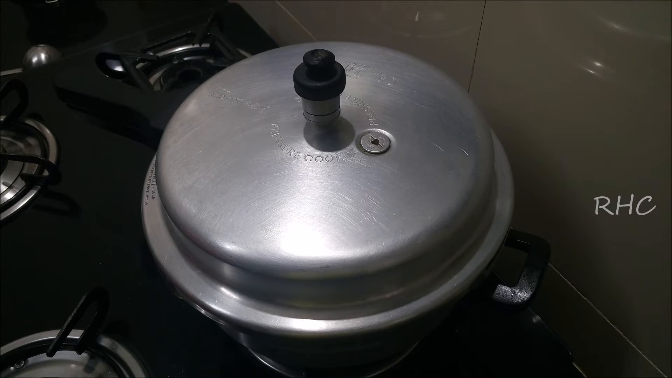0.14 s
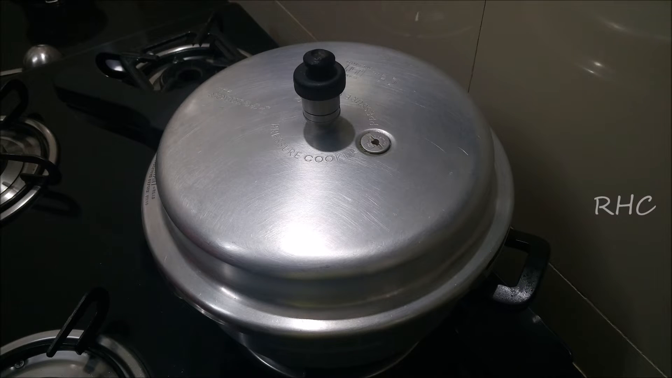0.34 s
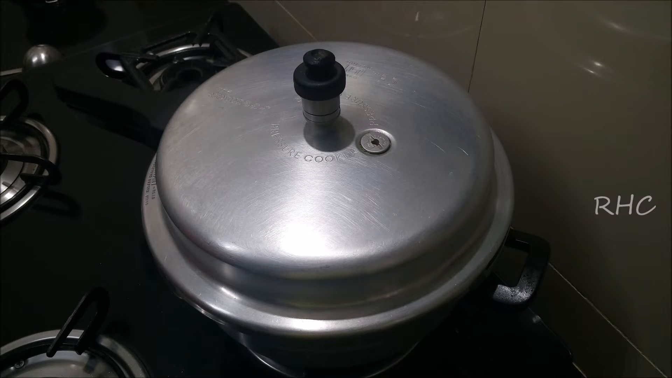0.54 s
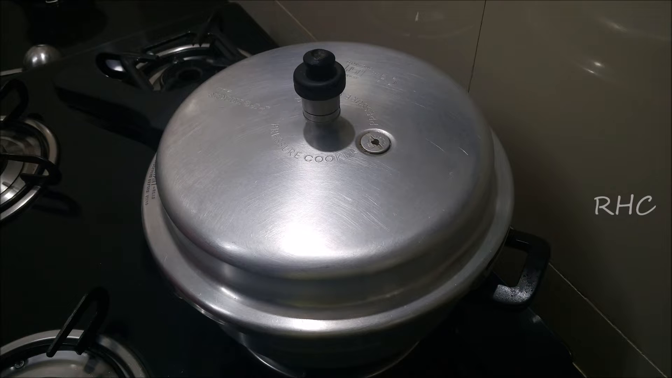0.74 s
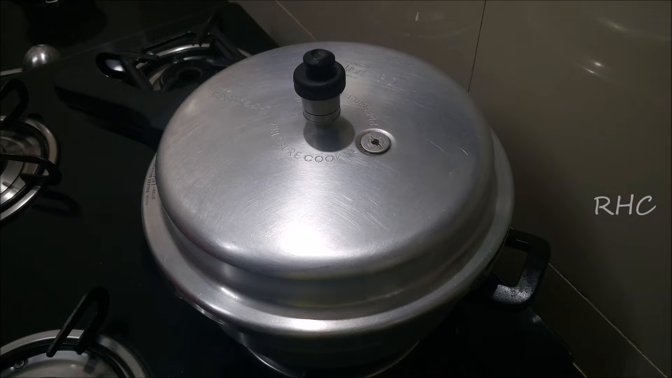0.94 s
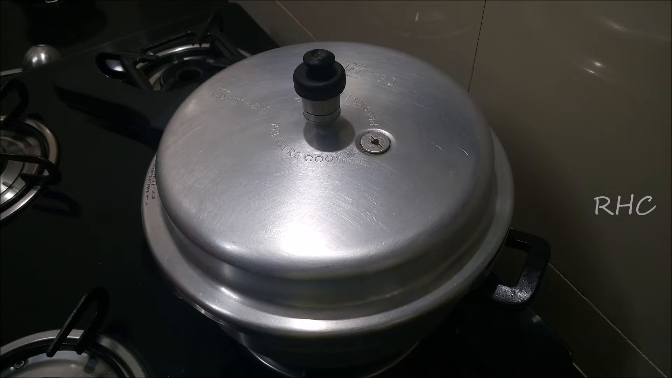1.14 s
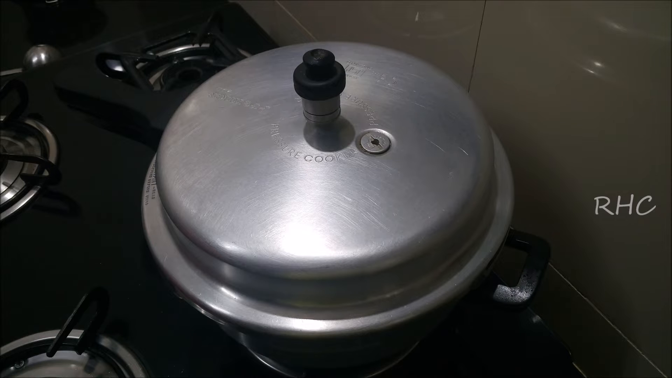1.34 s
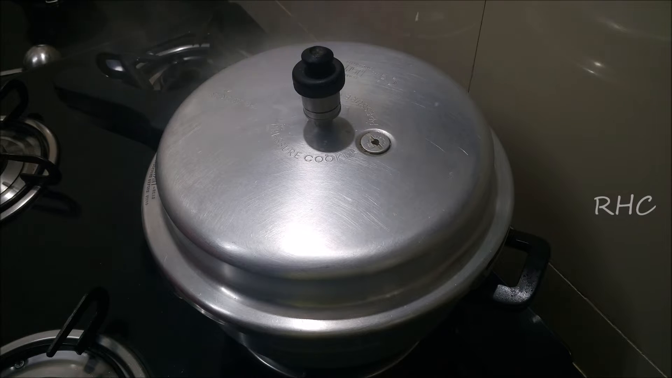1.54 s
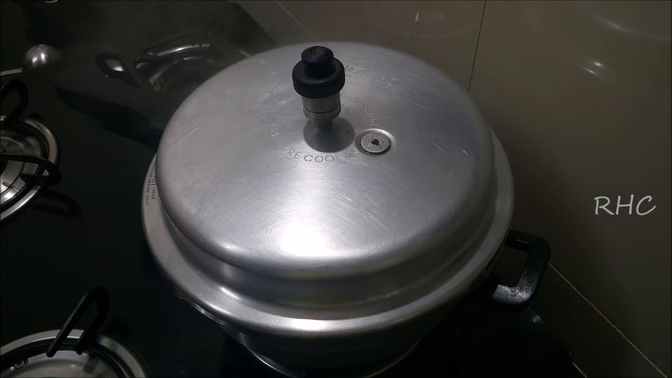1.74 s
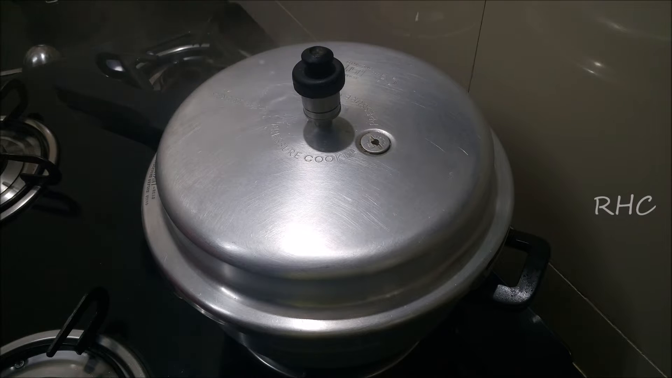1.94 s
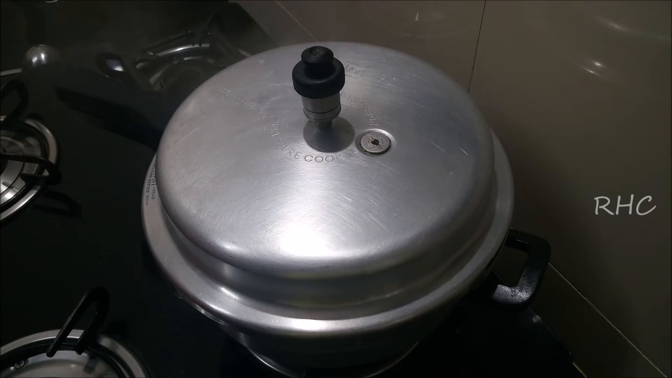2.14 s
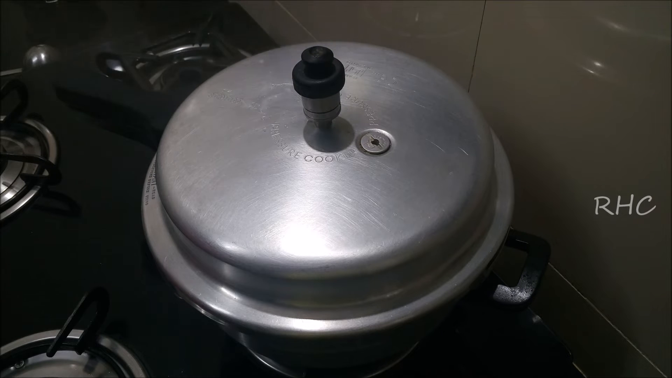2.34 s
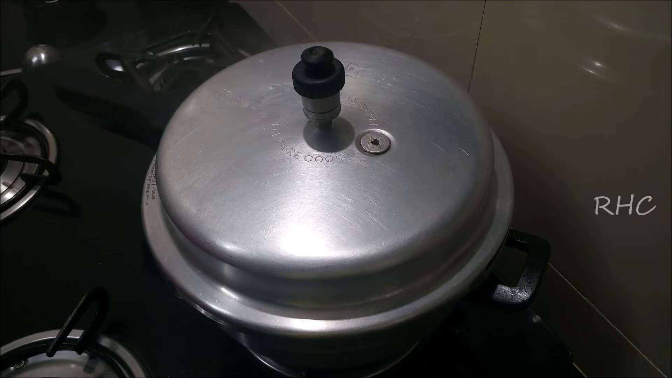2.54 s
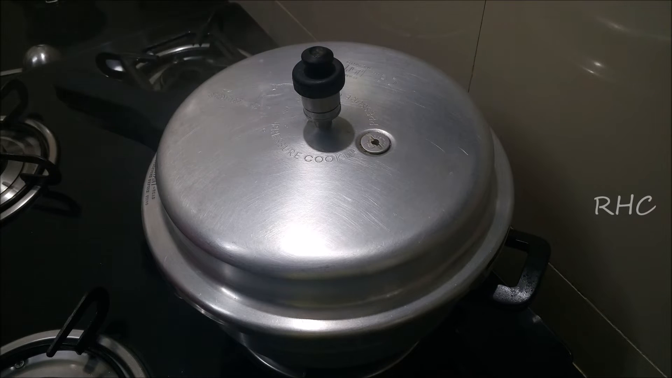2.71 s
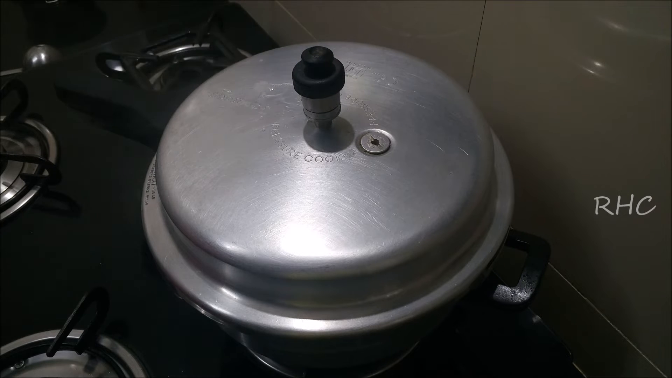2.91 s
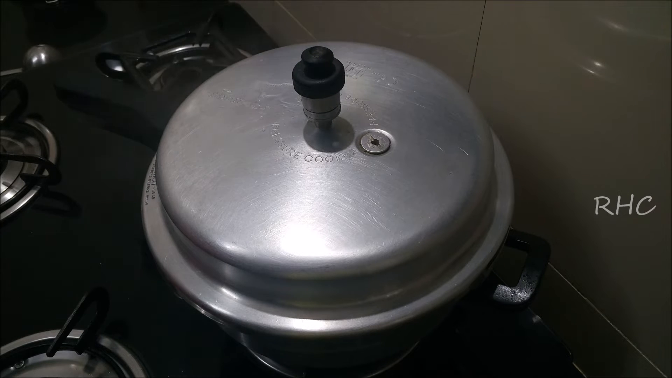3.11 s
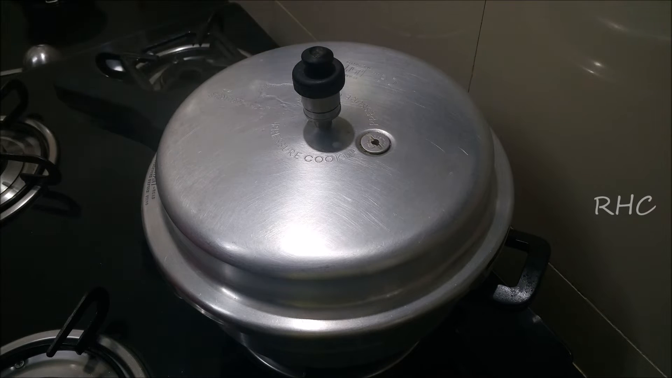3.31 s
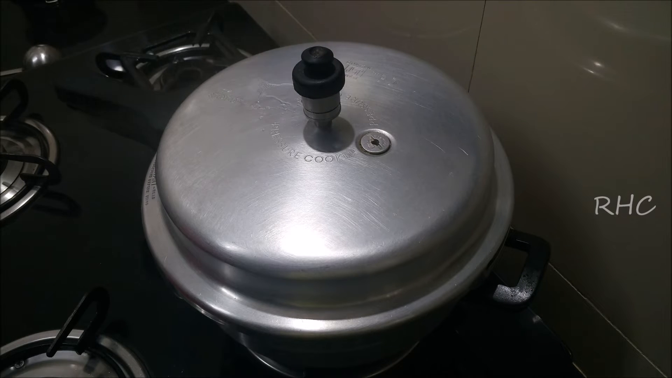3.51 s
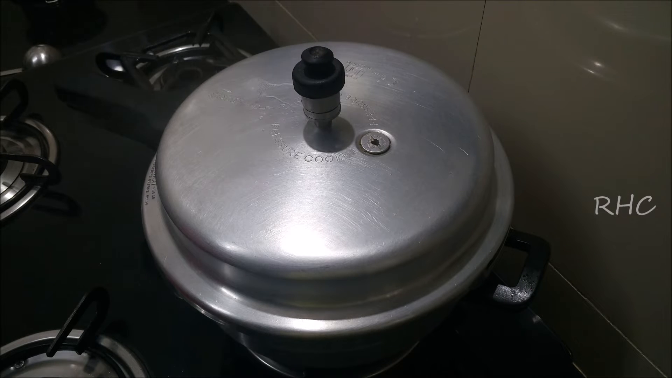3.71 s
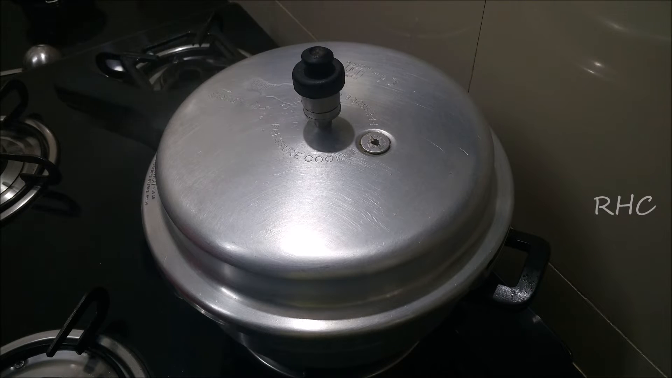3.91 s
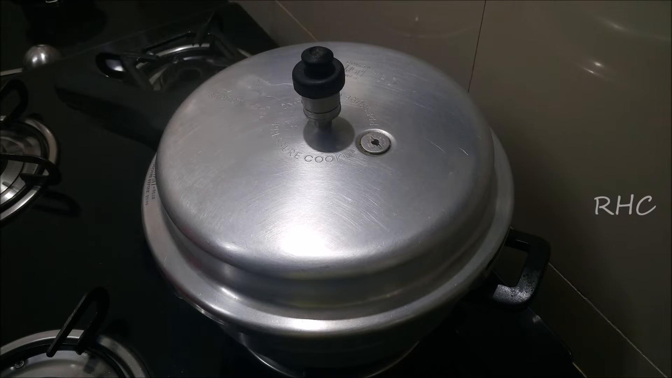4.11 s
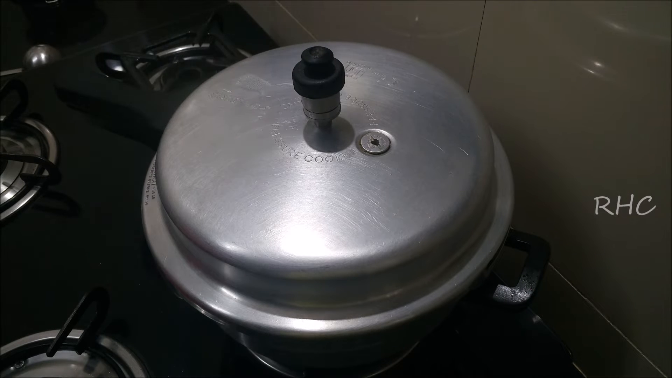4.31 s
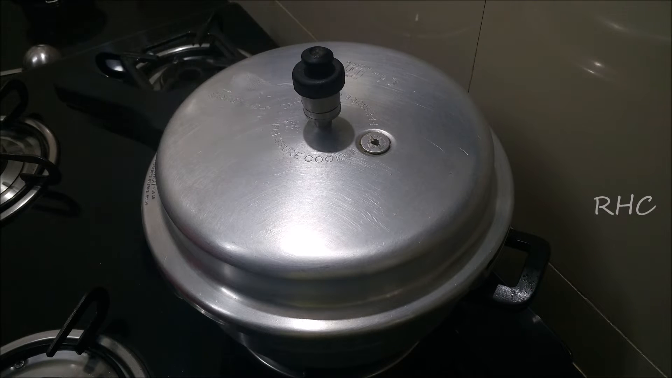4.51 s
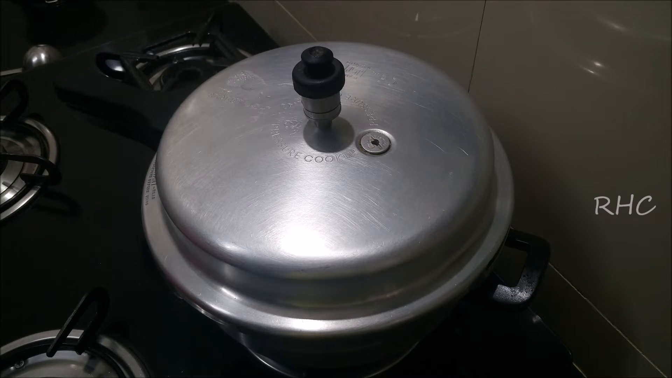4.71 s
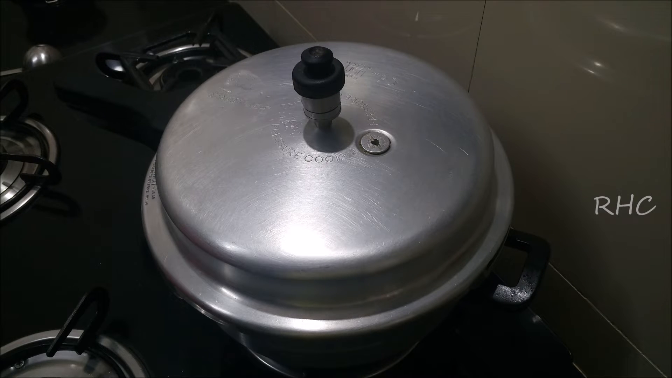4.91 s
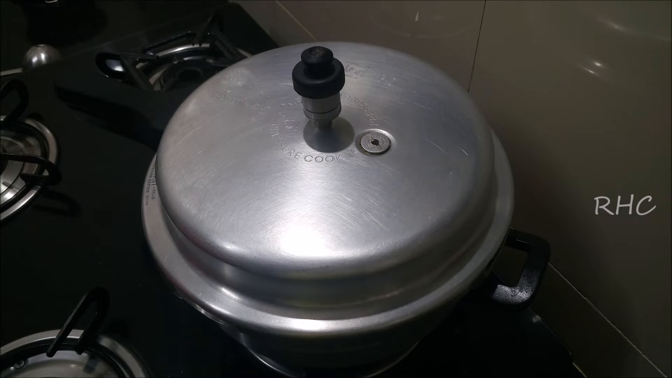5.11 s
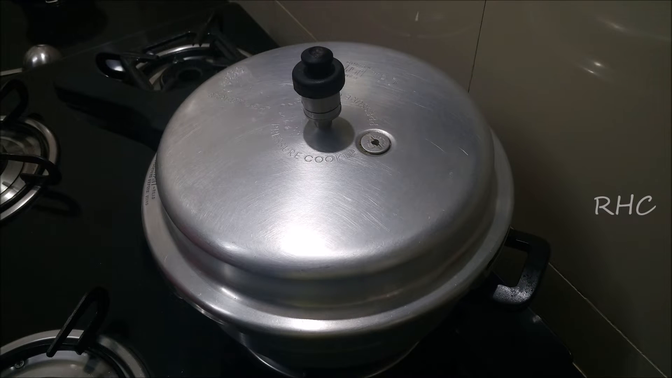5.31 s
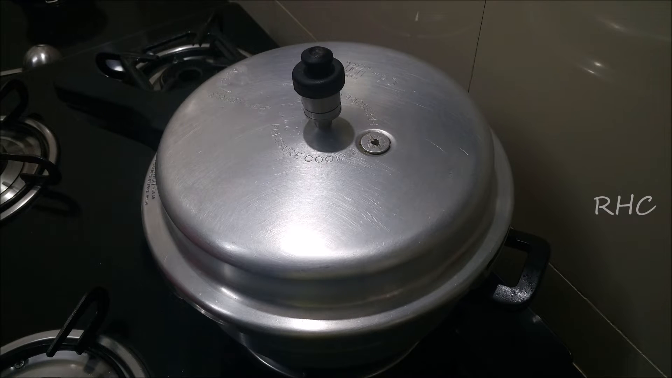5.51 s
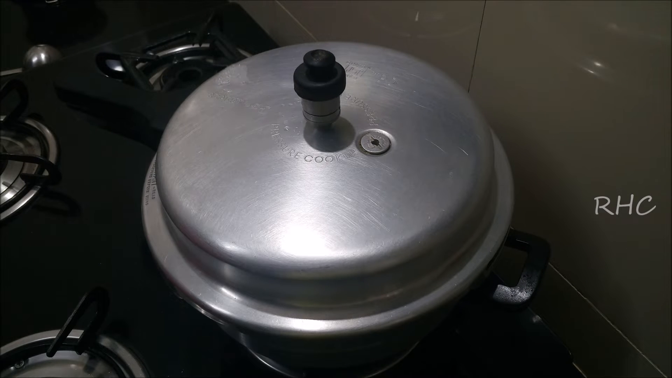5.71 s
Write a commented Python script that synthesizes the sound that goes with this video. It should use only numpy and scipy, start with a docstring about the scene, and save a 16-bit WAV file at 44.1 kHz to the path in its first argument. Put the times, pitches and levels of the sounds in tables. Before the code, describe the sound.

Close stereo pickup of a stovetop pressure cooker: first a faint, slowly growing high hiss with tiny spits, then an abrupt loud steam release with a short, low puff. The roar sags over a couple of seconds and settles into a continuous piercing hiss leaning left. Soft flame wash, low bubbling and a faint hum lie far beneath, in a small hard-walled kitchen.

```python
"""Pressure cooker letting off steam

A faint hiss leaks from the cooker, then its weight jerks up with a puff that jolts the pot, and steam roars out.
The weight sinks back a little and the jet narrows to a steady hiss: shaped noise, singing in vent and lid.
Underneath, bands of noise make the washing flame and bubbling water, with damped sines for the pot and a low hum.
The jet is heard mostly on the left, with short random echoes for the tiled kitchen around it."""
import sys
import numpy as np
from scipy import signal
from scipy.fft import rfft, irfft
from scipy.io import wavfile
from scipy.ndimage import uniform_filter1d

SR = 44100
rng = np.random.default_rng(int(sys.argv[2]) if len(sys.argv) > 2 else 0)


def dump_mix(stems):
    """Bounce the given channels to the path in sys.argv[1] as a 16-bit WAV at rate SR."""
    frames = np.atleast_2d(stems).T  # one column per channel
    limited = np.clip(frames, -1, 1)  # hard clip at full scale
    pcm = np.round(limited * 32767).astype(np.int16)
    wavfile.write(sys.argv[1], SR, pcm)


N = 253575
TIME = np.arange(N) / SR  # s
FREQ = np.maximum(np.arange(N // 2 + 1) * SR / N, 1)  # Hz, kept above 0 for the logarithms and divisions
TOP_HZ = 15500

# Moves of the weight, each leading to the next jet shape (lifts, drops back, comes to rest).
# Each row: middle of the move in seconds, duration in seconds.
WEIGHT_MOVES = [(1.606, 0.32), (2.84, 0.026), (3.52, 1)]
# Colour of the jet while the seated weight leaks. Each row: frequency in Hz, relative level in dB.
LEAKING_COLOUR = [(500, -26), (1000, -24.5), (1600, -19), (2200, -14), (3400, -13.5), (4500, -12),
                  (6000, -2.5), (6800, -3.5), (7400, -7.5), (8000, -13.5), (9200, -17), (10700, -23.5),
                  (12000, -35), (13300, -27), (15200, -26)]
# Colour of the jet under the lifted weight. Each row: frequency in Hz, relative level in dB.
LIFTED_COLOUR = [(500, -42), (1000, -31), (1700, -17), (2100, -11), (3400, -7.5), (4500, -6), (6000, -1.7),
                 (6800, -0.5), (7400, -0.5), (8000, -6.5), (9200, -6), (10700, -9), (12000, -15.5),
                 (13300, -14.5), (15200, -15.5)]
# Colour of the jet as the weight sinks back. Each row: frequency in Hz, relative level in dB.
SINKING_COLOUR = [(500, -38), (1000, -24), (1700, -15), (2000, -7.5), (3400, -6), (4500, -6.5), (6000, 1),
                  (6800, -3), (7400, 0), (8000, -10.5), (9200, -8), (10700, -13.5), (12000, -24),
                  (13300, -20), (15200, -23)]
# Colour of the jet once the weight has come to rest. Each row: frequency in Hz, relative level in dB.
RESTING_COLOUR = [(500, -38), (1000, -32.5), (1700, -24.5), (2000, -18), (3400, -15), (4500, -10),
                  (6000, -4), (6800, 2), (7400, -1.5), (8000, -6.5), (9200, -5), (10700, -14),
                  (12000, -22.5), (13300, -18), (15200, -21.5)]
# Resonances of vent, weight and lid. Each row: frequency in Hz, width in Hz, lift in dB before the ring amount.
VENT_RESONANCES = [(1080, 60, 3), (1360, 60, 5), (2018, 62, 6), (2207, 75, 2.5), (2584, 116, 2.5),
                   (3060, 76, 4), (3420, 130, 4), (4182, 85, 10), (4450, 70, 5), (4738, 60, 5.5),
                   (4960, 85, 7.5), (5170, 50, 5), (5385, 105, 7), (5659, 41, 4), (5915, 70, 2),
                   (6030, 60, 2), (6122, 65, 6), (6225, 45, 5), (6630, 80, 4.5), (6775, 85, 4),
                   (7067, 40, 2.5), (7346, 50, 1.5), (8280, 35, 4), (8380, 60, 4.5), (8665, 65, 3),
                   (9095, 75, 5.5)]
# Droplets spat through the vent. Each row: peak in seconds, level in dB over the jet.
DROPLET_SPITS = [(.910, 2), (1.181, 1), (1.615, -2), (1.666, 1), (1.886, 9), (2.005, -9), (2.353, 1),
                 (2.902, -6), (3.452, -1), (3.949, -4), (4.521, 4), (4.854, 10), (4.9, 9), (5.337, -7)]


def steam(walls, flutter_db=0.37, flutter_rate=110, lump_db=0.52, lump_rate=20, spit_s=0.00067):
    """Turbulent, slightly wet steam passes under the weight; each move of the weight reshapes the jet."""
    spits = sum(undb(db) * np.exp(-abs(TIME - s) / spit_s) for s, db in DROPLET_SPITS)
    flutter = undb(flutter_db * walk(flutter_rate))
    rush = turbulence(np.hypot(flutter, spits), diffuse=0.5)
    source = walls * eddies(rush, patchy_db=0.78, rate=26)
    vent_db = resonances(VENT_RESONANCES)
    jet = jet_shape(source, vent_db, LEAKING_COLOUR, ring=0.84, beam=0.69)
    shapes = [jet_shape(source, vent_db, LIFTED_COLOUR, ring=0.74, beam=0.62),
              jet_shape(source, vent_db, SINKING_COLOUR, ring=0.97, beam=0.77),
              jet_shape(source, vent_db, RESTING_COLOUR, ring=0.68, beam=0.74)]
    for (s, duration), shape in zip(WEIGHT_MOVES, shapes):
        moved = np.clip((TIME - s) / duration + .5, 0, 1)
        jet = (1 - moved) * jet + moved * shape
    hiss, roar = jet
    hiss_gain, roar_gain = jet_strength()
    lumps = undb(lump_db * walk(lump_rate))  # the big, slow eddies make the roar come in lumps
    return hiss * hiss_gain + roar * roar_gain * lumps


# How much louder the jet is on the left. Each row: frequency in Hz, difference in dB before the beam amount.
LEFT_BEAM = [(300, -7.5), (1000, 5), (2100, 3.5), (2800, 2.5), (4000, -2), (5300, 10), (6500, 16.5),
             (7300, 12.5), (9100, 12.5), (10500, 4), (13000, -1), (15200, 18)]


def jet_shape(source, vent_db, points, ring, beam, ring_right=0.064):
    """One position of the weight: the vent rings mostly towards the left; gives the hiss and the lower roar."""
    left_db = ring * vent_db
    right_db = ring_right * vent_db - beam * colour(LEFT_BEAM)
    db = colour(points) + np.array([left_db, right_db])
    spectrum = source * undb(db) / np.sqrt(1 + (450 / FREQ) ** 6)  # a thin jet has no bass
    upper = 1 / (1 + (4000 / FREQ) ** 12)
    hiss = in_band(spectrum * upper, 4000, 12000)
    roar = in_band(spectrum * (1 - upper), 1200, 4000)
    return np.array([hiss, roar])


# The leak under the seated weight grows with the pressure; its lower roar lies under the hiss.
LEAK_DB, LEAK_GROWTH_DB_PER_S, LEAK_ROAR_DB = -49.5, 1.33, -14.5
# The seated weight slips and the leak steps up. Each row: middle of the step in seconds, rise in dB.
WEIGHT_SLIPS = [(.285, 2), (1.118, 2)]
SLIP_SPREAD_S = .006
# The weight opens the vent in jerks. Each row: middle in seconds, spread in seconds, relative share of the opening.
LIFT_JERKS = [(1.548, 0.016, .13), (1.574, .0012, 0.18), (1.594, .003, 0.099), (1.623, 0.012, 0.71)]
# The open jet loses strength with the pressure until it holds steady.
LIFT_S, BLAST_DB, SAG_DB_PER_S, STEADY_DB = 1.53, -19.5, 2, -24.5
# Roar of the open jet: its level at the lift, and the dB it moves for each dB of hiss.
ROAR_DB, ROAR_PER_HISS = -30.5, 1.83
# Swells and dips as the weight wobbles. Each row: peak in seconds, half length in seconds, change of flow in dB.
JET_GUSHES = [(1.175, 0.05, 1), (1.676, 0.013, -0.3), (1.703, 0.0067, 0.5), (1.73, 0.022, -1.6),
              (1.853, .02, 1), (1.92, 0.034, 0.5), (2.24, 0.16, -1.0), (2.483, 0.14, 1.6),
              (2.87, 0.024, -0.5), (2.955, 0.018, -0.3), (3.1, 0.055, 1.1), (3.22, 0.07, 0.5),
              (3.322, 0.014, -1), (3.78, 0.064, -1.2), (4.19, 0.021, 0.2), (4.334, .06, 0.3),
              (4.587, 0.18, 0.93), (4.84, 0.01, -1), (4.99, 0.098, 0.8)]


def jet_strength():
    """Gains of hiss and roar: a growing leak, a jerky lift, then a sag to steady flow that the roar exaggerates."""
    opened = sum(share * step(s, spread_s) for s, spread_s, share in LIFT_JERKS)
    opened = opened / sum(share for _, _, share in LIFT_JERKS)
    gush_db = sum(db * bump(s, half_s) for s, half_s, db in JET_GUSHES)
    slip_db = sum(db * step(s, SLIP_SPREAD_S) for s, db in WEIGHT_SLIPS)
    leak = (1 - opened) * undb(LEAK_DB + LEAK_GROWTH_DB_PER_S * TIME + slip_db + gush_db)
    sag_db = np.maximum(-SAG_DB_PER_S * (TIME - LIFT_S), STEADY_DB - BLAST_DB)
    flow_db = sag_db + gush_db
    hiss = leak + opened * undb(BLAST_DB + flow_db)
    roar = leak * undb(LEAK_ROAR_DB) + opened * undb(ROAR_DB + ROAR_PER_HISS * flow_db)
    return hiss, roar


# The jet catches on the edge of the weight and briefly sings in the resonances near one pitch.
# Each row: peak in seconds, half length in seconds, pitch in Hz, swell in dB for a resonance right on that pitch.
JET_SINGS = [(.40, .12, 6030, 5), (.92, .11, 4182, 4), (.96, .14, 4738, 4), (1.17, .12, 6030, 4),
             (1.36, .08, 2584, 6), (1.34, .07, 2207, 5), (1.96, .07, 6650, 5), (3.02, .09, 4738, 6),
             (3.15, .12, 4980, 6), (3.26, .09, 4182, 9), (3.33, .16, 1360, 12), (3.43, .12, 6130, 6),
             (3.59, .07, 5120, 6), (3.77, .16, 4182, 8), (3.91, .08, 2207, 9), (4.05, .08, 9095, 4),
             (4.08, .09, 4450, 9), (4.13, .1, 4182, 9), (4.22, .09, 4738, 6), (4.36, .07, 6160, 6),
             (4.45, .08, 1360, 7), (4.58, .07, 2207, 3), (4.58, .07, 3420, 6), (5.10, .07, 6130, 10),
             (5.17, .08, 3460, 7), (5.31, .08, 4450, 7), (5.51, .08, 6180, 6)]
SING_REACH_HZ = 100


def singing(jet, waver_db=2.0, waver_rate=12):
    """Each resonance of the vent wavers on its own, and swells towards a whistle when the jet sings near it."""
    spectrum, out = rfft(jet), jet
    for hz, width, _ in VENT_RESONANCES:
        swell_db = waver_db * walk(waver_rate)
        for s, half_s, pitch, db in JET_SINGS:
            if abs(pitch - hz) < 2 * SING_REACH_HZ:
                nearness = np.exp(-((pitch - hz) / SING_REACH_HZ) ** 2)
                swell_db = swell_db + db * nearness * bump(s, half_s)
        band = irfft(spectrum * passband(hz, width), N)
        out = out + band * (undb(swell_db) - 1)
    return out


def burbling(jet, below_hz=1350, lump_db=1.7, lump_rate=24):
    """The biggest eddies break loose one by one, so the bottom of the roar comes in lumps."""
    low = irfft(rfft(jet) / (1 + (FREQ / below_hz) ** 8), N)
    return jet + low * (undb(lump_db * walk(lump_rate)) - 1)


# Resonances of the puff. Each row: frequency in Hz, width in Hz, lift in dB.
PUFF_RESONANCES = [(140, 40, 6), (320, 34, 8), (538, 55, 7), (680, 70, 4), (1310, 70, 4)]
# Broad colour of the wet puff. Each row: frequency in Hz, relative level in dB.
PUFF_TONE = [(40, -34), (130, -5), (230, -7), (320, -3.5), (600, 1), (1000, 1), (1400, 1), (2200, 10),
             (4000, -13)]


def puff(walls, sputter_db=1.0, sputter_rate=130, left_db=1.5):
    """The first slug of wet steam sputters out as the weight lifts."""
    source = walls * turbulence(undb(sputter_db * walk(sputter_rate)), diffuse=0.22)
    shape_db = colour(PUFF_TONE) + resonances(PUFF_RESONANCES)
    sound = in_band(source * undb(shape_db), 100, 900)
    return sound * puff_strength() * undb([[left_db], [-left_db]])


# The first wet puff swells, holds and dies away, leaving a weaker tail.
PUFF_S, PUFF_DB, PUFF_HOLD_S = 1.633, -36.5, 0.024
PUFF_RISE_DB_PER_S, PUFF_FALL_DB_PER_S = 610, 170
PUFF_TAIL_DB, PUFF_TAIL_DB_PER_S = -6.5, 74


def puff_strength():
    """Gain of the puff: attack, hold, and a quick fall into a slower tail."""
    before = np.maximum(PUFF_S - TIME, 0)
    after = np.maximum(TIME - PUFF_S - PUFF_HOLD_S, 0)
    release_db = np.maximum(-PUFF_FALL_DB_PER_S * after, PUFF_TAIL_DB - PUFF_TAIL_DB_PER_S * after)
    return undb(PUFF_DB - PUFF_RISE_DB_PER_S * before + release_db)


# Short spurts of wet steam as the weight stutters off its seat and hovers.
# Each row: peak in seconds, half length in seconds, centre in Hz, width in Hz, level in dB before panning.
STEAM_SPURTS = [(1.564, 0.0075, 2340, 650, -41), (1.582, 0.011, 2600, 800, -40),
                (1.602, 0.013, 695, 330, -45), (1.642, 0.0088, 10500, 4000, -33),
                (1.66, 0.0085, 500, 400, -50), (1.691, 0.015, 340, 240, -45),
                (1.735, 0.024, 895, 350, -45.5), (1.772, .012, 683, 250, -49), (1.78, .013, 170, 130, -56),
                (1.84, 0.018, 700, 500, -49.5), (1.892, .014, 330, 130, -60), (1.927, 0.014, 400, 250, -57),
                (2.057, .013, 920, 110, -55), (2.152, 0.023, 1090, 129, -51.5),
                (2.385, 0.015, 1080, 150, -51), (2.482, 0.013, 1120, 200, -56)]


def spurts(walls, left_db=1.0):
    """Wet steam escapes in short spurts while the weight breaks free and hovers."""
    source = walls * turbulence(1, diffuse=0.29)
    sound = 0
    for s, half_s, hz, width, db in STEAM_SPURTS:
        spurt = in_band(source * passband(hz, width), 0, TOP_HZ)
        sound = sound + spurt * undb(db) * bump(s, half_s)
    return sound * undb([[left_db], [-left_db]])


# Jolts of the pot, from the sudden release and from a big bubble. Each row: start in seconds, level in dB.
POT_JOLTS = [(1.625, -31), (4.657, -48)]
# What the full pot rings with. Each row: frequency in Hz, time to fall 60 dB in seconds, relative level in dB.
POT_RING = [(317.4, 0.23, 0.5), (362, .11, -8)]


def jolts(push_s=0.0078):
    """A soft push makes the full pot ring briefly with a dull, hollow note."""
    out = 0
    for s, db in POT_JOLTS:
        age = np.maximum(TIME - s, 0)
        ring = 0
        for hz, t60, mode_db in POT_RING:
            decay = np.exp(-np.log(1000) * age / t60)
            ring = ring + undb(mode_db) * np.sin(2 * np.pi * hz * age) * decay
        out = out + undb(db) * (1 - np.exp(-age / push_s)) * ring
    return out


# Clusters of big bubbles thumping in the pot.
# Each row: peak in seconds, half length in seconds, centre in Hz, width in Hz, level in dB.
BUBBLE_SURGES = [(0.515, 0.05, 144, 45, -59), (1.0, 0.037, 145, 50, -61), (3.746, .034, 138, 35, -53),
                 (3.85, 0.037, 153, 55, -55), (4.046, 0.033, 450, 80, -59), (4.574, 0.089, 140, 35, -58),
                 (4.675, .035, 290, 130, -60), (4.735, 0.068, 137, 26, -50.5), (5.265, 0.061, 144, 45, -57)]


def surges():
    """Clusters of big bubbles thump in the pot, each in a broad, well-damped resonance."""
    source = turbulence(1, diffuse=0.067)
    out = 0
    for s, half_s, hz, width, db in BUBBLE_SURGES:
        resonance = 1 / (1 + ((FREQ - hz ** 2 / FREQ) / width) ** 2)
        out = out + in_band(source * resonance, 0, TOP_HZ) * undb(db) * bump(s, half_s)
    return out


# Colour of the wash of the flame. Each row: frequency in Hz, relative level in dB.
WASH_COLOUR = [(25, -17), (70, -4), (110, -4), (200, -4.5), (320, 0), (420, 0.5), (560, -0.5), (680, -6.5),
               (850, -11.5), (1400, -14), (3000, -11)]
# Hollow resonances of pot and stove in the wash. Each row: frequency in Hz, width in Hz, lift in dB.
STOVE_HOLLOWS = [(152, 20, 6), (195, 18, 6), (312, 22, 5), (380, 20, 3), (428, 20, 3), (485, 20, 3),
                 (550, 28, 4), (695, 36, 7)]
# Colour of the rumbling bubbles. Each row: frequency in Hz, relative level in dB.
RUMBLE_COLOUR = [(50, -34), (78, -16), (98, -3.5), (120, -10.5), (140, -2.5), (175, -9), (240, -16),
                 (400, -22)]
# The water boils up once the pressure has fallen.
BOIL_UP_S, BOIL_UP_SPREAD_S = 2.95, 0.071
WASH_DB, WASH_BOIL_UP_DB = -66, 6
RUMBLE_DB, RUMBLE_BOIL_UP_DB = -70.5, 5


def boiling(walls):
    """The flame washes while bubbles rumble, both as wavering noise; both grow as the water boils up."""
    wash = walls * turbulence(undb(1.0 * walk(27)), diffuse=0.14)
    wash = wash * undb(colour(WASH_COLOUR) + resonances(STOVE_HOLLOWS))
    bubbles = turbulence(undb(0.69 * walk(19)), diffuse=0.043)
    bubbles = bubbles * undb(colour(RUMBLE_COLOUR)) / (1 + (FREQ / 900) ** 2)
    wash, rumble = in_band(wash, 230, 750), in_band(bubbles, 90, 210)
    boil = step(BOIL_UP_S, BOIL_UP_SPREAD_S)
    wash_gain = undb(WASH_DB + WASH_BOIL_UP_DB * boil)
    rumble_gain = undb(RUMBLE_DB + RUMBLE_BOIL_UP_DB * boil)
    return rumble * rumble_gain + wash * wash_gain


HUM_HZ, HUM_DB = 49.4, -69.5  # level before the boil-up swell and panning


def hum(left_db=4.5, murk_db=-9, boil_up_db=3):
    """A faint low hum in a murky band of bass comes in with the blast and firms up as the water boils."""
    tone = np.sqrt(2) * np.sin(2 * np.pi * HUM_HZ * TIME)
    murk = in_band(turbulence(1, diffuse=.4) / (1 + (FREQ / 60) ** 4), 20, 80)
    fade_in = np.clip((TIME - 1.55) / 0.22, 0, 1)
    swell = fade_in * undb(boil_up_db * (step(BOIL_UP_S, BOIL_UP_SPREAD_S) + 0.5))
    return (tone + undb(murk_db) * murk) * swell * undb(HUM_DB + np.array([[left_db], [-left_db]]))


def tiles(echo_db=-7.0, t60=0.12):
    """Weak, quick reflections off the nearby walls ripple the spectrum at each microphone."""
    decay = np.exp(-np.log(1000) * TIME / t60)
    echoes = rng.standard_normal((2, N)) * decay * (TIME > .002)
    return 1 + undb(echo_db) * rfft(echoes / np.linalg.norm(echoes, axis=1, keepdims=True))


def turbulence(strength, diffuse, lag_ms=.12):
    """Stereo spectrum of rushing noise: its direct part reaches the right first, the rest comes from separate
    eddies, different at each microphone."""
    direct, *scattered = rfft(rng.standard_normal((3, N)) * strength)
    delay = np.exp(-2j * np.pi * FREQ * np.array([[lag_ms / 1000], [0]]))  # left, right
    diffuse = np.clip(diffuse, 0, 1)
    return np.sqrt(1 - diffuse) * direct * delay + np.sqrt(diffuse) * np.array(scattered)


def eddies(spectrum, patchy_db, rate, count=22):
    """Eddies of each size come and go, so overlapping bands swell on their own."""
    place = np.interp(FREQ, [1000, 15000], [0, count - 1])
    bands = (irfft(spectrum * np.maximum(1 - abs(place - k), 0), N) for k in range(count))
    return rfft(sum(band * undb(patchy_db * walk(rate)) for band in bands))


def in_band(spectrum, lo, hi):
    """Stereo sound from a spectrum, with unit rms of its centre between lo and hi in Hz."""
    centre = irfft(spectrum.mean(axis=0) * ((FREQ > lo) & (FREQ < hi)), N)
    return irfft(spectrum, N) / centre.std()


def colour(points):
    """dB at every frequency from (Hz, dB) points."""
    hz, db = np.transpose(points)
    return np.interp(np.log(FREQ), np.log(hz), db)


def resonances(modes):
    """dB lift at every frequency from (Hz, width, dB) modes."""
    return sum(db / (1 + (2 * (FREQ - hz) / width) ** 2) for hz, width, db in modes)


def passband(hz, width):
    """Gain at every frequency of a bell-shaped band."""
    return np.exp(-((FREQ - hz) / width) ** 2)


def walk(rate):
    """Random levels held 1 / rate s and slewed; spread 1."""
    k = max(int(SR / rate), 2)
    held = rng.standard_normal(N)[np.arange(N) // k]
    smooth = uniform_filter1d(held, k)
    return smooth / smooth.std()


def step(s, spread_s):
    """A smooth change from 0 to 1, halfway at time s."""
    return .5 + .5 * np.tanh((TIME - s) / (2 * spread_s))


def bump(s, half_s):
    """A smooth swell from 0 to 1 and back, highest at time s."""
    return np.exp(-((TIME - s) / half_s) ** 2)


def undb(db):
    """Decibels to gain."""
    return 10 ** (np.asarray(db) / 20)


def scene():
    """The singing jet with its spurts and puff over the boiling pot; jet, steam and wash share the tiled walls."""
    walls = tiles()
    jet = burbling(singing(steam(walls)))
    pot = jolts() + surges() + boiling(walls)
    return jet + puff(walls) + spurts(walls) + pot + hum()


def record(dry):
    """The recorder rounds the very highest peaks and cuts the top."""
    rounded = dry / (1 + (dry / .8) ** 6) ** (1 / 6)
    return signal.sosfilt(signal.ellip(12, .1, 90, TOP_HZ, fs=SR, output="sos"), rounded)


dry = scene()
out = record(dry)
dump_mix(out)
```